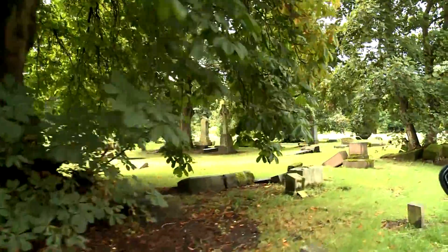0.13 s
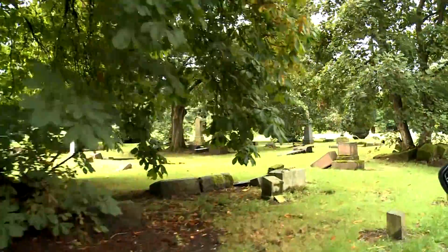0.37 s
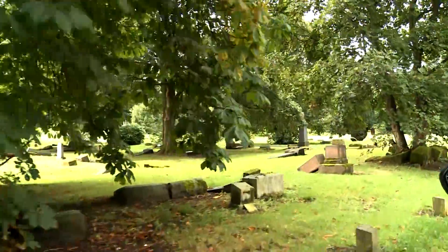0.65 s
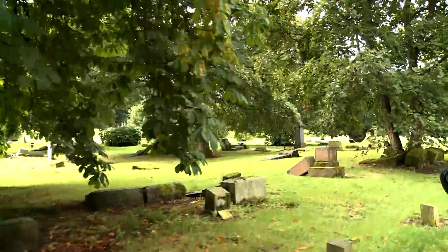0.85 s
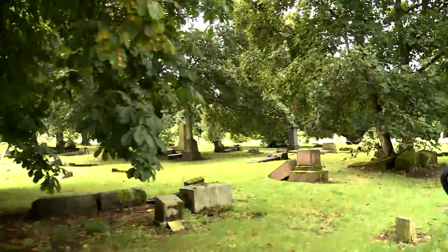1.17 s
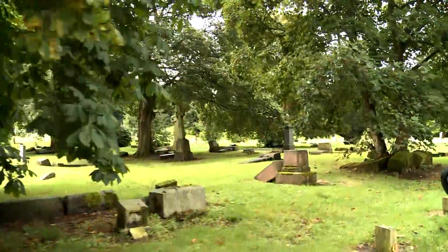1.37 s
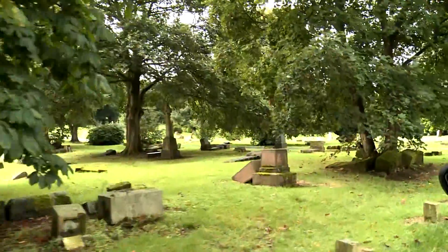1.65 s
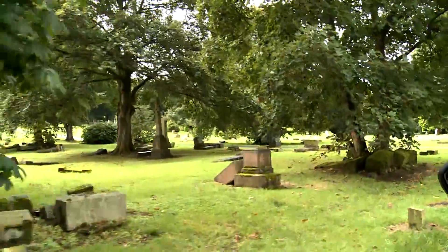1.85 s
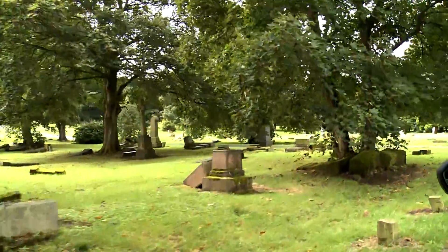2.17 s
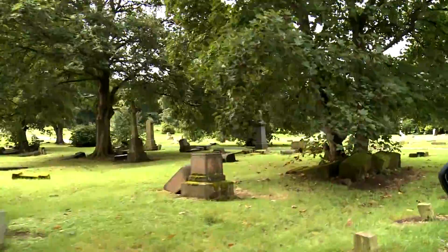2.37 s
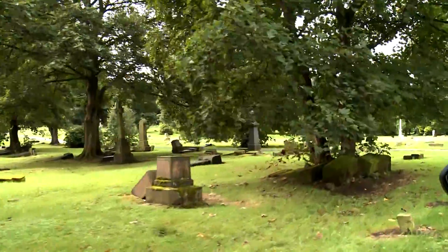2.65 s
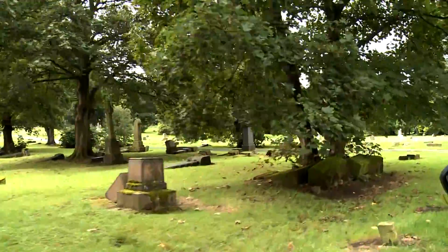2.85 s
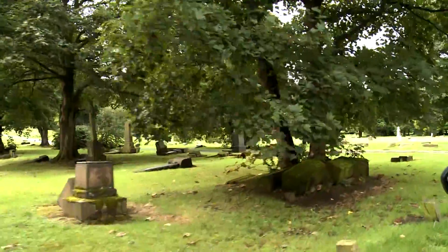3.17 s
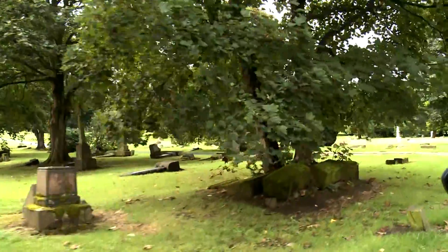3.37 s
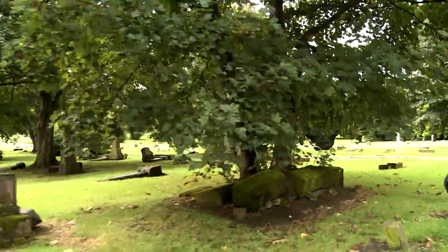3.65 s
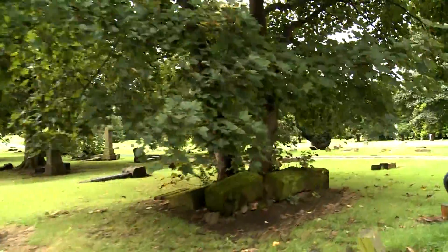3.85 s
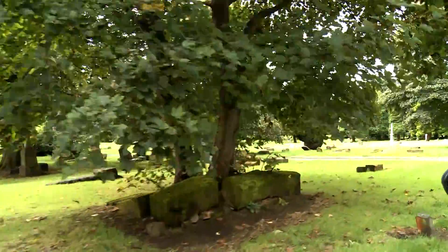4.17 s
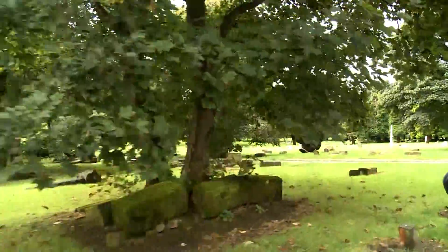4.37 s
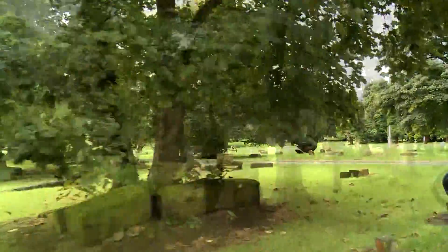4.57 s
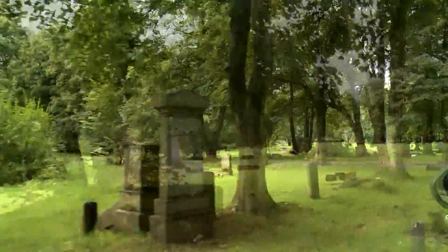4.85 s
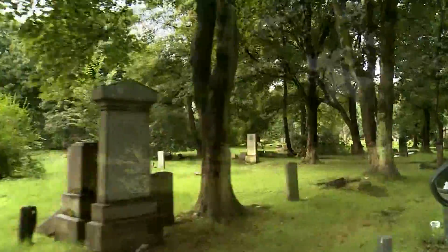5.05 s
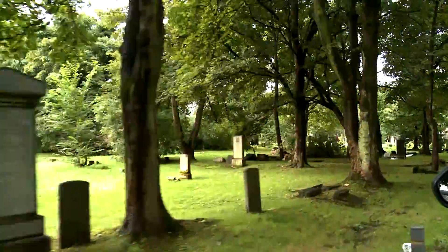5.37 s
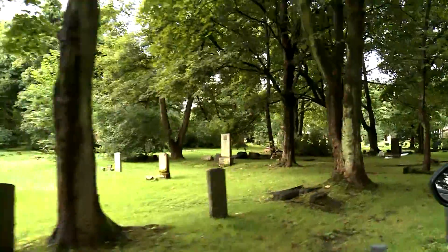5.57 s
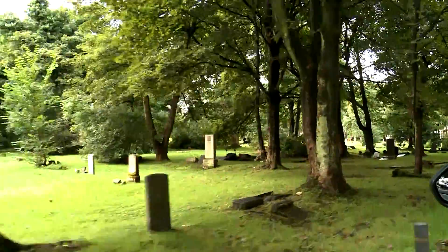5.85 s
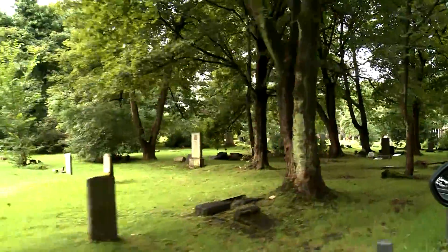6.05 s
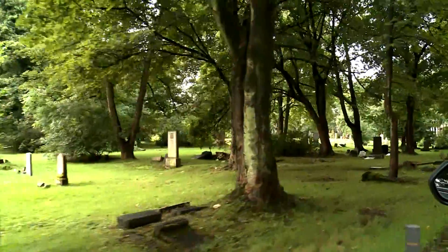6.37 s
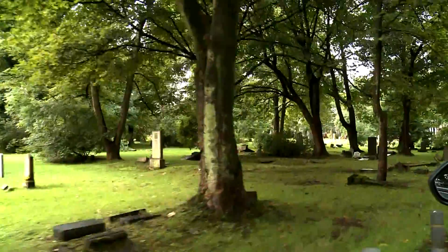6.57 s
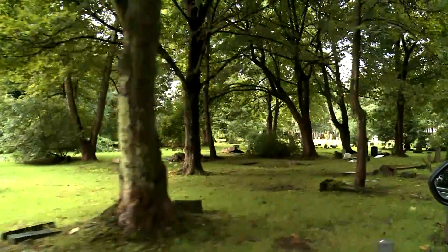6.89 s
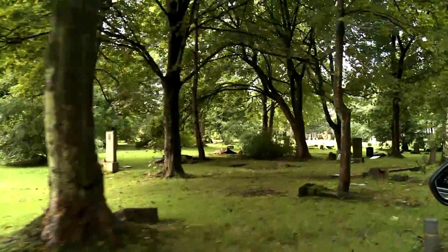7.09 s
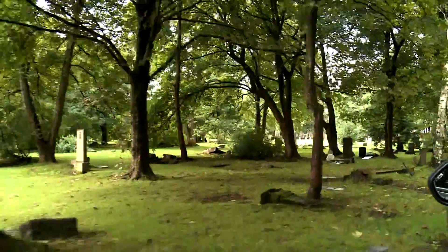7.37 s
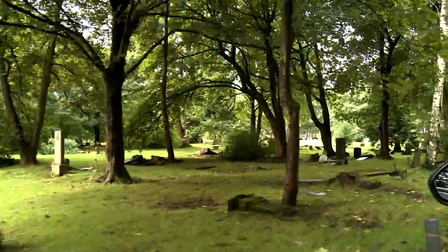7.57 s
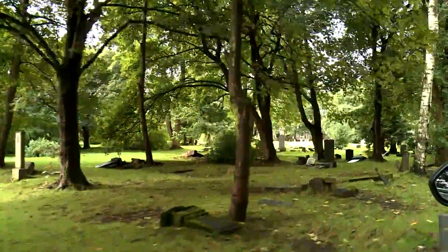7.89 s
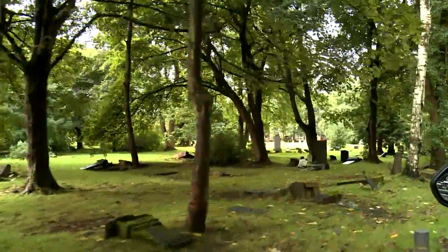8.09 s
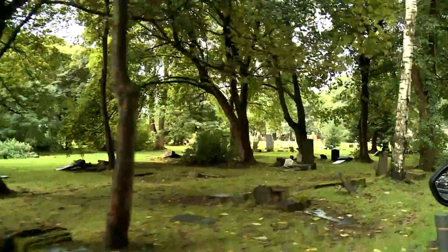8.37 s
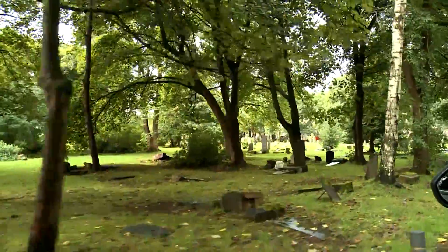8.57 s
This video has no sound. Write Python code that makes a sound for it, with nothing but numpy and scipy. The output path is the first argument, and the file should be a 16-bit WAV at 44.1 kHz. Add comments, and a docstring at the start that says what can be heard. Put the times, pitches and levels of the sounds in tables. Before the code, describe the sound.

Wind rumbles on the microphone at a slow car's open window, strengthening partway through, over a steady engine drone and rushing tyres.

```python
"""A lane, heard from the open side window of a creeping car.
The engine drones in low exhaust tones, with a drive-train hum and a wheel drone, under the rush and
hiss of the tyres. A little grit ticks, and the treble crackles in brief swells. Eddies of wind buffet
the microphone; after one sharp click the wind is stronger, and it builds to a heavy gust near the end."""
import sys
import numpy as np
from scipy import signal
from scipy.fft import rfft, irfft
from scipy.io import wavfile

SR = 44100
rng = np.random.default_rng(int(sys.argv[2]) if len(sys.argv) > 2 else 0)


def dump(signal):
    """Clip the signal to [-1, 1] and save it as 16-bit WAV at the path in sys.argv[1]."""
    limited = np.clip(np.atleast_2d(signal).T, -1, 1)
    pcm = np.round(limited * 32767).astype(np.int16)
    wavfile.write(sys.argv[1], SR, pcm)


N = 384993
TIME = np.arange(N) / SR
BINS = np.fft.rfftfreq(N, 1 / SR)
CLICK_S = 4.8286  # cue for the click and the stronger wind


def amp(db):
    """Decibels to gain."""
    return 10 ** (np.asarray(db) / 20)


def automation(rows):
    """One curve per value column of a timed table, sample by sample."""
    times, *columns = np.transpose(rows)
    return [np.interp(TIME, times, column) for column in columns]


def eq(points):
    """Gain at every frequency, from (frequency [Hz], level [dB]) points."""
    hz, db = np.transpose(points)
    return amp(np.interp(np.log(BINS + 1), np.log(hz + 1), db))


def filtered(x, gain):
    """Filters x by a gain per frequency and scales it to rms 1."""
    y = irfft(rfft(x) * gain, N)
    return y / np.sqrt(np.mean(y ** 2) + 1e-20)


def noise(gain):
    """Coloured noise of rms 1."""
    return filtered(rng.standard_normal(N), gain)


def drift(rate_hz):
    """Random modulation of rms 1, rolling off above the given rate."""
    return noise(1 / (1 + (BINS / rate_hz) ** 4))


def levelled_noise(points, span_s):
    """Coloured noise with its slow swells ridden out and its quick lumps kept."""
    x = noise(eq(points))
    power = irfft(rfft(x ** 2) * np.exp(-(BINS * span_s) ** 2), N)
    return x / np.sqrt(abs(power) + .05)


def crackle(points, per_s, spread_db):
    """Coloured ticks of random sign, a few much larger than the rest; rms 1."""
    size = amp(spread_db * np.minimum(rng.exponential(1, N), 4))
    ticks = (rng.random(N) < per_s / SR) * rng.choice([-1, 1], N) * size
    return filtered(ticks, eq(points))


def swell(peak_s, rise_s, fall_s):
    """A smooth hump of height 1."""
    t = TIME - peak_s
    return np.exp(-np.minimum((t / np.where(t < 0, rise_s, fall_s)) ** 2, 50))


def harmonic(turns, order):
    """A sine of rms 1 at a multiple of the pitch, starting at a random phase."""
    return np.sqrt(2) * np.sin(2 * np.pi * (order * turns + rng.random()))


def wavering_tone(curve, tones, waver_db, wander):
    """Unsteady harmonics on one wandering pitch, faded out just before the click."""
    hz, db = automation(curve)
    turns = np.cumsum(hz * (1 + wander * drift(7.7))) / SR
    fade = np.clip((CLICK_S - TIME) / 0.23, 0, 1)
    out = sum(amp(level + waver_db * drift(10.3)) * harmonic(turns, order) for order, level in tones)
    return fade * amp(db) * out


# the load on the tread: (time [s], effort [dB])
TYRE_EFFORT = [(0, 0.5), (1.3, -.5), (2.1, -3), (3.4, -4.5), (4.7, -3), (4.9, -6), (5.6, -3), (6.65, -3),
               (7.1, .5), (8, 2.5), (8.73, 1.5)]
def tyre_effort():
    """How hard the tyres work the lane, in dB; drives fizz, hiss and rush."""
    return automation(TYRE_EFFORT)[0]


# airy top end: (frequency [Hz], level [dB])
FIZZ_EQ = [(3500, 6), (5200, -9), (5700, -26), (6600, -23), (8000, -1), (9000, 4.5), (9900, 6.5),
           (10600, 11), (11300, 6.5), (12000, 2), (13200, 8.5), (13800, -2), (14500, 11), (15700, -2)]
def fizz(calm_db=-65, windy_db=-60):
    """A thin, flickering sizzle with fine specks; it follows the tyres and steps up with the wind."""
    level = np.where(TIME < CLICK_S, calm_db, windy_db) + 0.93 * tyre_effort()
    specks = amp(-9) * crackle(FIZZ_EQ, per_s=1200, spread_db=6)
    return amp(level + 0.6 * drift(25)) * (noise(eq(FIZZ_EQ)) + specks)


# the treble of the tread: (frequency [Hz], level [dB])
HISS_EQ = [(2500, 4), (3600, 7), (4250, 1), (4650, 3.5), (4900, 2), (5350, 4.5), (5650, -3.5), (6400, 3.5),
           (7300, 3), (8000, -6), (12000, -12.5)]
def tyre_hiss(rolling_db=-62, floor_db=-66):
    """A fine hiss grained by tiny stones; it rides the tyres' effort above a steady floor."""
    stones = amp(-8) * crackle(HISS_EQ, per_s=700, spread_db=5.5)
    gain = np.hypot(amp(rolling_db + 1.027 * tyre_effort()), amp(floor_db))
    return gain * (noise(eq(HISS_EQ)) + stones)


# treble swells: (centre [s], half length [s], relative crackle [dB], relative sizzle [dB])
SIZZLE_SWELLS = [(.28, .05, -65, -67.5), (.7, .03, -76, -66), (1.321, .02, -72, -64), (1.5, .018, -72, -62),
                 (1.71, .035, -65, -63), (4.735, 0.013, -65, -65), (5.462, .06, -76, -62),
                 (5.74, 0.11, -78, -59.5), (6.24, .025, -62, -59), (6.43, 0.023, -62, -63),
                 (6.85, .03, -59, -61), (7.179, .05, -58.5, -61), (8.05, .04, -58, -58)]
def sizzle_swells(trim_db=1.5, grains_per_s=4000, clump_db=2):
    """Brief swells of high, clumpy crackle with a sizzle on top."""
    cracks = crackle(HISS_EQ, grains_per_s, spread_db=3)
    sizzle = crackle(FIZZ_EQ, grains_per_s, spread_db=3)
    swells = sum(swell(s, half, half) * (amp(crackle_db) * cracks + amp(sizzle_db) * sizzle)
                 for s, half, crackle_db, sizzle_db in SIZZLE_SWELLS)
    return amp(trim_db + clump_db * drift(45)) * swells


# stone ticks: (time [s], relative level [dB], ring [Hz], 60 dB decay [s])
GRIT_TICKS = [(.308, -32, 2700, .015), (1.277, -24, 2740, 0.012), (6.555, -47.5, 6400, 0.03),
              (6.85, -56, 4470, 0.066), (8.012, -42, 3297, 0.029), (8.076, -46, 4576, 0.034)]
def grit(trim_db=-3, width=0.26, attack_s=0.0012):
    """Small stones snap out from under the tread: short noise bursts, each around one pitch."""
    out = np.zeros(N)
    t = np.arange(SR // 10) / SR
    attack = np.minimum(t / attack_s, 1)
    for s, db, hz, t60 in GRIT_TICKS:
        ring = noise(1 / (1 + ((BINS / hz - 1) / width) ** 2) ** 2)[:len(t)]
        start = round(s * SR)
        out[start:start + len(t)] += ring * attack * amp(db + trim_db - 60 * t / t60)
    return out


# the hum's path: (time [s], pitch [Hz], relative level [dB])
HUM_CURVE = [(0, 102.8, -56), (1, 104.2, -61), (1.55, 103, -46), (2.4, 105.6, -45.5), (3.3, 102.6, -50),
             (3.85, 103.2, -43.5), (4.8, 102.1, -52)]
# its timbre: (harmonic [x pitch], gain [dB])
HUM_HARMONICS = [(1, 2.5), (2, -3), (3, -9.5)]
def drive_train():
    """The drive train turns with a wavering hum."""
    return amp(-.5) * wavering_tone(HUM_CURVE, HUM_HARMONICS, waver_db=2.5, wander=0.0039)


# the drone's path: (time [s], pitch [Hz], relative level [dB])
DRONE_CURVE = [(0, 32.02, -52), (1.1, 31.47, -44), (1.9, 30.87, -47.5), (2.6, 30.82, -39.5),
               (3.2, 30.43, -41.5), (3.7, 29.86, -39), (4.2, 29.8, -49.5), (4.8, 29.6, -38)]
# its timbre: (harmonic [x pitch], gain [dB])
DRONE_HARMONICS = [(2, 1), (3, -1), (5, -12.5)]
def wheels():
    """A low drone from the wheels that sags as the car slows."""
    return amp(-1) * wavering_tone(DRONE_CURVE, DRONE_HARMONICS, waver_db=3, wander=0.0055)


# the engine's bass note: (time [s], firing rate [Hz], relative level [dB])
ENGINE_CURVE = [(0, 32.25, -29), (.8, 32.24, -29), (1.3, 31.8, -30), (1.8, 32.15, -34), (2.2, 32.65, -32),
                (3.1, 32.35, -32), (3.6, 32.04, -39.5), (4.3, 32, -30), (5.2, 31.13, -40),
                (6.8, 30.58, -36.5), (7.2, 30.78, -33.5), (7.8, 31.6, -26.5), (8.73, 31.3, -44)]
# the exhaust tones above it: (harmonic [x firing rate], base level [dB])
EXHAUST_HARMONICS = [(2, -47.5), (3, -45.5), (4, -46.5), (5, -61)]
def engine(trim_db=-.3, throb_db=1.8, uneven_db=2.5, duck_db=-4):
    """Exhaust tones lock to the firing rate and swell separately; the upper ones duck after the click."""
    hz, db = automation(ENGINE_CURVE)
    turns = np.cumsum(hz) / SR
    duck = duck_db * (TIME > CLICK_S)
    tones = [(1, db + trim_db + throb_db * drift(5.7))]
    tones += [(order, level + uneven_db * drift(4.4) + duck) for order, level in EXHAUST_HARMONICS]
    return sum(amp(level) * harmonic(turns, order) for order, level in tones)


# the body of the tread noise: (frequency [Hz], level [dB])
RUSH_EQ = [(100, -1.5), (380, -1), (560, 3.5), (660, 0.5), (1010, 0.5), (1160, -6), (1290, -4), (1560, 0),
           (2080, -7.5), (2400, -5.5), (2750, -11.5), (3000, -18), (3600, -26.5), (5800, -58)]
# narrow rings and notches in it: (frequency [Hz], width [Hz], gain [dB])
RUSH_RINGS = [(392, 37, -14), (552, 14, 3), (589, 8.7, 3.5), (624, 18, -2.5), (780, 25, 1.5), (1262, 21, 5),
              (1300, 13, 5.5), (1470, 26, 0.5), (1532, 25, 3.5), (1576, 14, 3), (1573, 42, -5),
              (1620, 30, -1), (1742, 16, -11), (1742, 36, 5)]
def tyre_rush(base_db=-42.5, crossover_hz=2000, grain_db=0.95):
    """Grainy tread noise that brightens with effort; strong wind carries a little more of it in."""
    effort = tyre_effort()
    rings = amp(sum(db / (1 + (2 * (BINS - hz) / width) ** 2) for hz, width, db in RUSH_RINGS))
    rush = noise(eq(RUSH_EQ) * rings) * amp(grain_db * drift(64))
    body = irfft(rfft(rush) / (1 + (BINS / crossover_hz) ** 8), N)
    treble = (rush - body) * amp(1.43 + 0.61 * effort)
    level = base_db + 0.074 * effort + 0.11 * np.maximum(wind_strength(), 0)
    return amp(level) * (body + treble)


def click(step_db=-17, decay_s=0.0021):
    """One sharp click: the signal steps down and quickly settles."""
    t = TIME - CLICK_S
    return -np.sign(t) * amp(step_db) / 2 * np.exp(-abs(t) / decay_s)


# low wind hits: (time [s], pitch [Hz], relative peak [dB], half length [s])
WIND_THUMPS = [(2.889, 58, -22, 0.035), (5.03, 44.8, -20, 0.017), (5.378, 54.8, -13, 0.018),
               (5.829, 60, -21, 0.013), (6.04, 183, -27.5, 0.036), (6.07, 45, -17, 0.033),
               (6.746, 35, -16, .02), (6.908, 35.2, -12, 0.014), (7.228, 45, -19, 0.013),
               (7.57, 29.9, -13, 0.036), (7.752, 57, -4.5, 0.01), (7.8, 120, -19, 0.016),
               (7.99, 46.1, -7.5, 0.017), (8.185, 108, -20, 0.018), (8.683, 71.4, -21, 0.024)]
def thumps(trim_db=-1):
    """An eddy hits the microphone squarely: a brief swinging pulse of pressure."""
    out = np.zeros(N)
    for s, hz, db, half in WIND_THUMPS:
        t = TIME - s
        out -= amp(db + trim_db) * np.exp(-(t / half) ** 2) * np.cos(2 * np.pi * hz * t)
    return out


# the bed of wind at the window: (time [s], strength [dB])
WIND_BED = [(0, -8.5), (2.3, -7.3), (3.7, -6), (4.1, -8.5), (4.82, -5), (4.84, -1), (5.6, 0), (6.4, 1),
            (7.5, 0.5), (8.73, 2.5)]
# gusts on top: (peak time [s], rise [s], fall [s], lift [dB])
WIND_GUSTS = [(2.88, .22, 0.11, 5), (4.85, .015, 0.049, 2.5), (6.06, 0.034, 0.034, 1.5),
              (6.54, 0.061, .04, 4), (7.74, .07, 0.2, 10), (7.98, 0.12, 0.32, 5.5), (8.7, 0.038, 0.043, 6)]
def wind_strength():
    """The steady wind plus its gusts, in dB."""
    bed, = automation(WIND_BED)
    return bed + sum(db * swell(s, rise, fall) for s, rise, fall, db in WIND_GUSTS)


# sub-bass buffet, bass flutter and midrange roar, each: (frequency [Hz], level [dB])
BUFFET_EQ = [(5, -13), (14, -5), (22, 9.5), (32, 4.5), (48, 0.5), (70, -1), (100, -5), (150, -24),
             (300, -66), (1000, -110)]
FLUTTER_EQ = [(50, -1), (95, 2), (130, 1), (180, 0), (260, -4), (400, -14), (800, -51), (3000, -100)]
ROAR_EQ = [(150, -20), (300, -1), (420, -4), (550, -5.5), (700, -8.5), (1000, -12.5), (1200, -20),
           (2000, -25.5), (4000, -52), (8000, -90)]
def wind(buffet_db=-28, flutter_db=-33.5, roar_db=-39.5):
    """Large eddies shake the microphone; smaller ones flutter and roar, sharing a quick churn."""
    strength = wind_strength()
    calm_db = -5 * (TIME < CLICK_S)  # holds the roar back until the click
    churn = amp(1.32 * drift(17))
    buffet = amp(buffet_db + 0.88 * strength + drift(7.2)) * levelled_noise(BUFFET_EQ, span_s=0.2)
    flutter = amp(flutter_db + 0.9 * strength) * levelled_noise(FLUTTER_EQ, span_s=0.15)
    roar = amp(roar_db + 0.68 * strength + calm_db) * levelled_noise(ROAR_EQ, span_s=0.1)
    return buffet + churn * (flutter + roar)


def scene():
    """Car and wind, mixed in mono."""
    car = engine() + drive_train() + wheels() + tyre_rush() + tyre_hiss()
    return (car + sizzle_swells() + grit() + wind() + thumps() + fizz() + click())[None]


def record(dry):
    """A steep low-pass takes off the very top, above 15.8 kHz."""
    low_pass = signal.firwin(511, 15800, window=("kaiser", 9), fs=SR)
    return signal.oaconvolve(dry, low_pass[None], "same")


dry = scene()
out = record(dry)
dump(out)
```